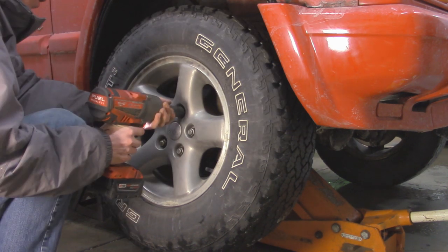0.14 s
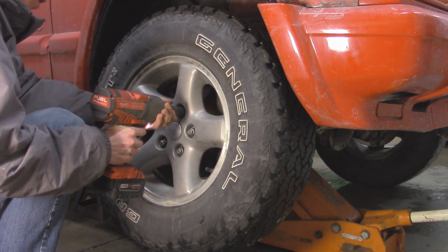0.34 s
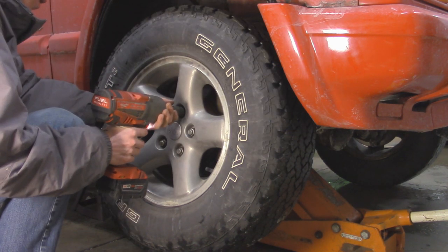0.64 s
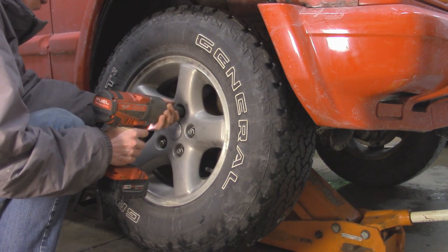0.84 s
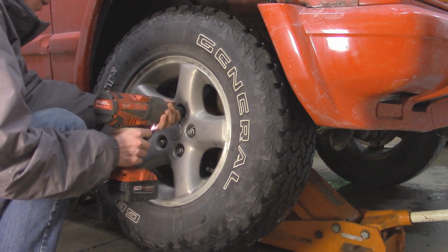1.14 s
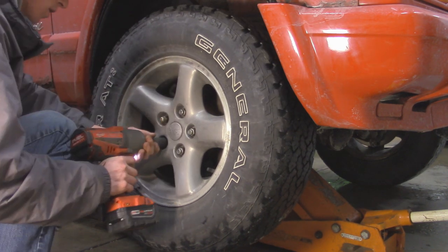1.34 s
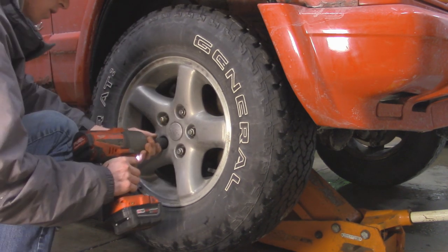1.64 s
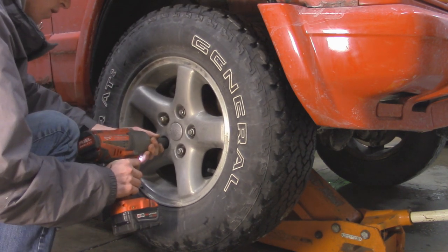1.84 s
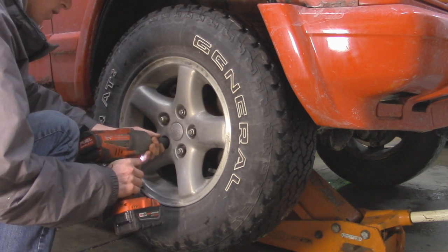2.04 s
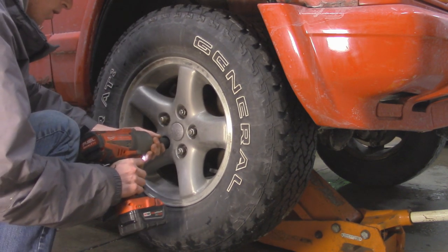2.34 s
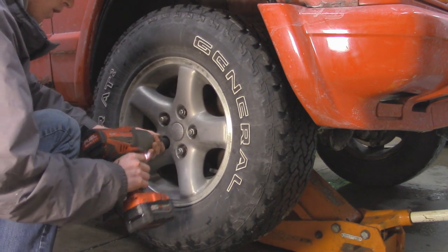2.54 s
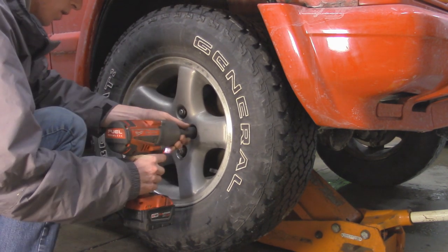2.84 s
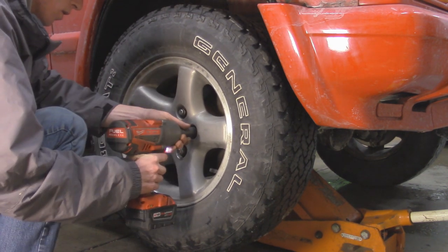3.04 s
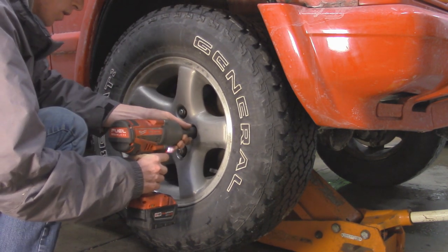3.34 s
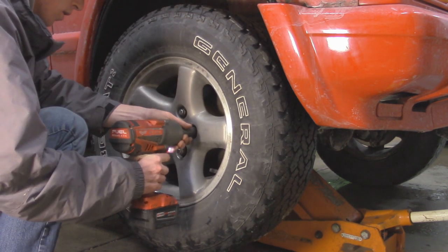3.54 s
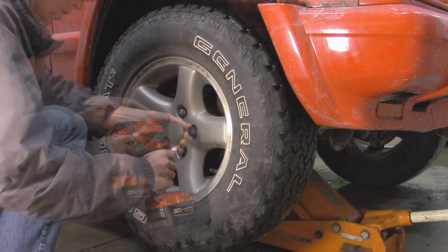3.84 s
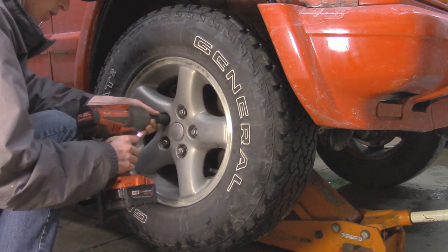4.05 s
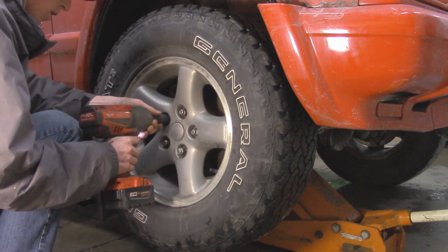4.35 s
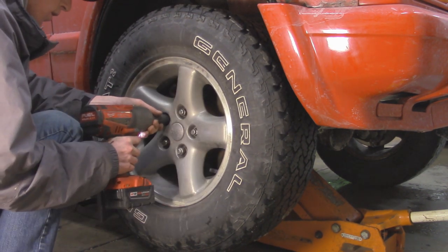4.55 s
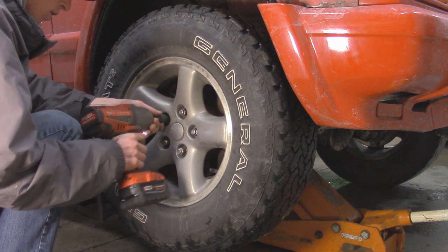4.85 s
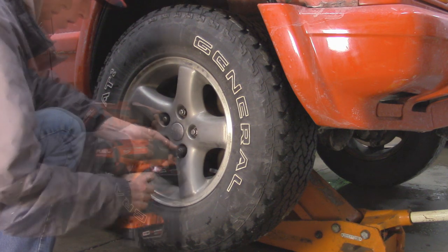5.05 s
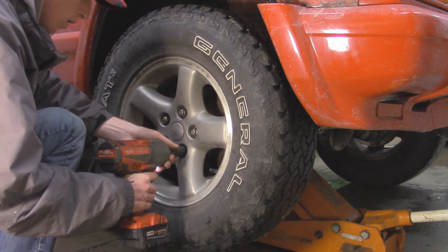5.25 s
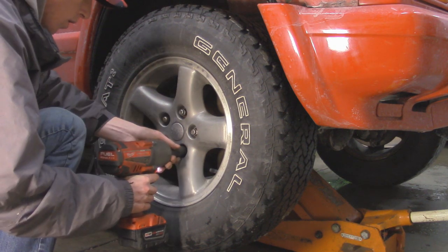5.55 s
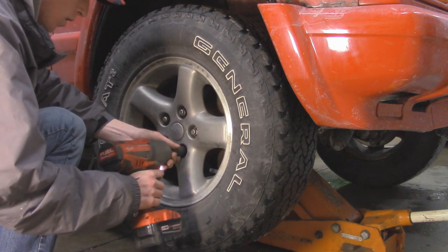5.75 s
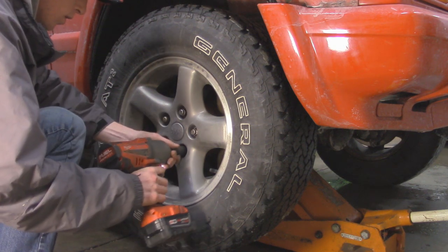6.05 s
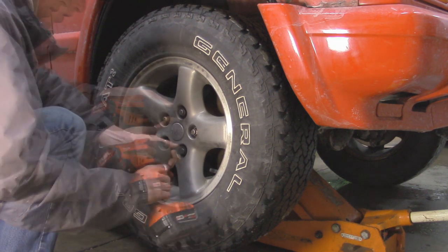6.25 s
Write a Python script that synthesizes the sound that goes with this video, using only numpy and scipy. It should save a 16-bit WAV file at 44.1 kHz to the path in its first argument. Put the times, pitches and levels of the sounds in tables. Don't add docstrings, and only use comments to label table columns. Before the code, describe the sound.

A cordless impact wrench works very close to the microphone in a garage. A high electric whistle and gear whine climb and hold, then break into hard steel clacks and a loose socket rattle. More bursts follow, some labouring, later ones faster and louder, with low thuds from the wheel and two hollow knocks midway. Faint room echo; it ends on a brief nudge.

```python
import sys
import numpy as np
from scipy import signal
from scipy.fft import rfft, irfft, next_fast_len
from scipy.io import wavfile
from scipy.ndimage import uniform_filter1d

SR = 44100
rng = np.random.default_rng(int(sys.argv[2]) if len(sys.argv) > 2 else 0)


def ratio(d):
    e = np.asarray(d, float) / 20
    return 10 ** e


def generate_wav(signal):
    frames = np.transpose(np.atleast_2d(signal))
    scaled = np.clip(frames, -1, 1) * 32767
    pcm = np.round(scaled).astype(np.int16)
    wavfile.write(sys.argv[1], SR, pcm)


N = 282227


def rms_one(x):
    return x / np.sqrt(np.mean(x ** 2) + 1e-20)


def in_time(rows):
    s, *columns = np.transpose(rows)
    return [np.interp(np.arange(N) / SR, s, c) for c in columns]


def bursts(tables, fade_s=0.0044):
    edges = []
    for table in tables:
        first, last = table[0][0], table[-1][0]
        edges += [(first - fade_s, 0), (first, 1), (last, 1), (last + fade_s, 0)]
    return in_time(edges) + in_time([row for table in tables for row in table])


def by_speed(law, hz):
    speeds, *columns = np.transpose(law)
    return [np.interp(np.log(np.maximum(hz, 1)), np.log(speeds), c) for c in columns]


def drift(rate):
    r = np.exp(-16 * np.pi * rate / SR)
    slow = signal.lfilter([1], [1, -2 * r, r * r], rng.standard_normal(N // 8 + 8002))[8000:]
    return np.interp(np.arange(N) / 8, np.arange(len(slow)), rms_one(slow))


def colour(x, spectrum, peaks=()):
    size = next_fast_len(N + 4096) * 2
    hz = np.maximum(np.arange(size // 2 + 1) * SR / size, 10)
    corner_hz, corner_db = np.transpose(spectrum)
    shape_db = np.interp(np.log(hz), np.log(corner_hz), corner_db)
    for peak_hz, width_hz, peak_db in peaks:
        shape_db = shape_db + peak_db / (1 + (2 * (hz - peak_hz) / width_hz) ** 2)
    cepstrum = irfft(np.log(ratio(shape_db)), size)
    cepstrum[1:size // 2] *= 2
    cepstrum[size // 2 + 1:] = 0
    return rms_one(irfft(rfft(x, size) * np.exp(rfft(cepstrum)), size)[:N])


def band(x, low_hz, high_hz):
    return signal.sosfilt(signal.butter(2, [low_hz, high_hz], "band", fs=SR, output="sos"), x)


def resonate(x, hz, width_hz):
    r = np.exp(-np.pi * width_hz / SR)
    poles = [1, -2 * r * np.cos(2 * np.pi * hz / SR), r * r]
    return signal.lfilter([(1 - r * r) / 2, 0, (r * r - 1) / 2], poles, x)


def lifted(x, peaks):
    return x + sum((ratio(peak_db) - 1) * resonate(x, hz, width_hz) for hz, width_hz, peak_db in peaks)


def grains(per_s, spread_db):
    sizes = ratio(spread_db * np.minimum(rng.exponential(1, N), 4)) * rng.choice([-1, 1], N)
    return rms_one(sizes * (rng.random(N) < per_s / SR))


def lines(orders, turns, base_hz=0, wobble_db=1.5, blur=.2):
    base = base_hz * np.arange(N) / SR
    total = 0
    for order, level_db in orders:
        level = np.sqrt(2) * ratio(level_db + wobble_db * drift(18.0))
        total = total + level * np.sin(2 * np.pi * (base + order * turns) + blur * drift(34.4))
    return total


def quiet_air():
    # (frequency [Hz], density [dB per Hz])
    air_colour = [(180, -50), (300, 7.5), (1940, 5.5), (2040, -23), (3670, -45), (4120, -20), (15000, -60)]
    return ratio(-44.5) * colour(rng.standard_normal(N), air_colour)


def garage(x):
    size = next_fast_len(N + SR)
    hz = np.arange(size // 2 + 1) * SR / size
    t60_s = .55 / (1 + hz / 14000)
    echo = 0
    for k, lag_s in enumerate(rng.uniform(.017, .047, 10)):
        loop = ratio(-60 * lag_s / t60_s) * np.exp(-2j * np.pi * hz * lag_s)
        echo = echo + (-1) ** k * loop / (1 - loop)
    return irfft(rfft(x, size) * echo, size)[:N] / np.sqrt(10)


def wheel():
    # (time [s], level [dB])
    rumble = [(0.0, -46.5), (1.84, -28.5), (2.17, -29.5), (3.12, -52.5), (3.6, -34), (3.74, -32.5),
              (6.02, -37), (6.4, -49)]
    # (frequency [Hz], density [dB per Hz])
    lows = [(12, -34), (20, -1), (65, 2), (141, -2), (195, 2), (273, -10), (500, -5.5), (650, -48),
            (1100, -120)]
    # (time [s], peak [dB], pitch [Hz])
    thuds = [(0.257, -26, 214), (1.073, -15.5, 207), (1.201, -36, 355), (1.658, -18, 153),
             (1.739, -12, 260), (1.801, -14.5, 132), (1.991, -25, 240), (2.161, -23.5, 168),
             (2.28, -21, 339), (3.633, -15.5, 199), (3.961, -17, 198), (4.726, -28, 303), (5.08, -20, 208),
             (5.598, -44, 239), (5.92, -22, 212)]
    level_db = in_time(rumble)[0] - 3.0 + 1.6 * drift(6.0)
    out = ratio(level_db) * colour(rng.standard_normal(N), lows)
    t = np.arange(round(.15 * SR)) / SR
    swell_and_die = (1 - np.exp(-t / 0.0019)) * np.exp(-t / 0.016)
    for s, peak_db, hz in thuds:
        at = round(s * SR)
        out[at:at + len(t)] += ratio(peak_db + 2) * swell_and_die * np.sin(2 * np.pi * hz * t)
    return out


def seating():
    # (time [s], pitch [Hz], peak [dB])
    knocks = [
        (3.585, 617, -11),
        (3.63, 683, -7),
    ]
    out, t = np.zeros(N), np.arange(round(.08 * SR)) / SR
    envelope = np.minimum(t / 0.004, 1) * np.exp(-t / 0.015)
    for s, hz, peak_db in knocks:
        at = round(s * SR)
        out[at:at + len(t)] += ratio(peak_db) * envelope * np.sin(2 * np.pi * hz * t)
    return out


def coasting():
    # (start [s], end of hold [s], level [dB], swell [dB], brightness [dB])
    coasts = [(-.3, -0.018, -33.5, 4.7, 1.5), (1.078, 1.36, -9.5, -5.5, 2), (2.307, 2.591, -14.5, 3, 1.3),
              (3.645, 3.9, -12, 0.5, 1.64), (4.731, 5.05, -15.5, 4, 2.5), (5.617, 5.776, -16.5, 4.5, 1.1),
              (5.936, 6.099, -14, 2.5, 2)]
    jolt_db, jolt_s, fade_db_per_s, dull_db_per_s = 5, 0.08, 99, 13
    t, stops = np.arange(N) / SR, np.array(coasts)
    latest = np.searchsorted(stops[:, 0] - .009, t) - 1
    start, end, level_db, swell_db, bright_db = stops[latest].T
    late_s = np.maximum(t - end, 0)
    level_db = level_db + jolt_db * np.exp(-np.maximum(t - start, 0) / jolt_s)
    level_db = level_db + swell_db * np.clip((t - start) / (end - start), 0, 1) - fade_db_per_s * late_s
    gate = np.clip((t - start) / 0.003 + 1, 0, 1)
    return gate, level_db, np.maximum(bright_db - dull_db_per_s * late_s, -4)


def socket():
    # (frequency [Hz], density [dB per Hz])
    socket_colour = [(120, -41), (200, -10.5), (379, -13.5), (599, -1.5), (946, -1.5), (1700, -0.5),
                     (2590, 4), (3280, 1.5), (4480, 1), (7890, -8), (12000, -25.5), (15800, -37)]
    # (frequency [Hz], width [Hz], height [dB])
    socket_peaks = [(2310, 3100, 5), (4820, 1900, 5), (7310, 1200, 6.5)]
    gate, level_db, bright_db = coasting()
    contacts = 0.38 * grains(6000, spread_db=-2.5) + 0.84 * rng.standard_normal(N)
    chatter = colour(contacts, socket_colour, socket_peaks)
    sizzle_db = 2 + 1.2 * bright_db
    chatter += (ratio(sizzle_db) - 1) * band(chatter, 8900, 14500)
    high = band(chatter, 3740, 9900)
    tipped = ratio(bright_db) * high + ratio(-bright_db) * (chatter - high)
    return gate * ratio(level_db + 0.86 * drift(57)) * tipped


def struck(times, gains, decay_s, contact_s=0.0028):
    clicks = np.zeros(N)
    clicks[np.round(np.array(times) * SR).astype(int)] = gains
    delay = round(contact_s * SR)
    plateau = signal.lfilter(np.ones(delay), [1], clicks)
    fall = signal.lfilter([1], [1, -np.exp(-1 / (decay_s * SR))], np.roll(clicks, delay) + 1e-18)
    return plateau + fall


def hammer():
    # (time [s], peak [dB], treble share [dB])
    clacks = [(0.2596, 0, -39), (1.0782, 3.5, -30), (1.091, 4, -26), (1.115, 3, -3.5), (1.166, -1.5, -15),
              (1.22, 5, -10), (1.2369, 1.5, -8), (2.33, -4, -28), (2.3463, 4, -15), (2.3682, -1, -19),
              (2.3894, -10, -19), (2.3993, -6, -8), (2.4319, 6.5, -17), (2.4588, 1, -20), (3.6496, -8, -36),
              (3.6608, 2, -27), (3.71, 1, -31), (4.1965, 8, -11.5), (4.218, 8, -9), (4.238, 9.5, -7.5),
              (4.754, -1, -5.5), (4.81, 5, -46), (4.8685, 2, -17), (5.2017, 0.5, -35), (5.957, 6, -10.5)]
    # (time [s], peak [dB], treble share [dB], first lug ahead [ms])
    doubles = [(1.108, 11, -12, 6), (1.2016, 5, -24, 4.4), (2.3108, 1.5, -28, 9.7), (3.679, 6.5, -11, 6.7),
               (3.7383, 3.5, -11.5, 7.3), (4.7422, 4, -16, 14), (4.797, -2, -25, 14), (5.6169, 2, -1, 10.6),
               (5.931, 0, -27, 8.4)]
    blows = list(clacks)
    for s, db, share_db, ahead_ms in doubles:
        blows.append((s, db, share_db))
        blows.append((s - ahead_ms / 1000, db - 7, share_db - 8))
    s, peak_db, treble_db = np.transpose(blows)
    crack = rng.standard_normal((3, N))
    middle = struck(s, ratio(peak_db - 6.0), 0.0033) * rms_one(band(crack[0], 1170, 6020))
    treble = struck(s, ratio(peak_db + treble_db - 2), 0.0037) * rms_one(band(crack[1], 5800, 10560))
    bass = struck(s, ratio(peak_db - 24), 0.012) * rms_one(band(crack[2], 215, 1180))
    return band(middle, 340, 8900) + treble + bass


def drive(speed_hz):
    # (field speed [Hz], upper whistle [dB], lower whistle [dB], pinion [dB], planet gears [dB])
    tone_law = [(12, -61, -37, -56, -52), (105, -53.5, -36, -63, -62), (277, -25.5, -38, -41.5, -40.5),
                (354, -26.5, -37.5, -32, -33), (572, -23, -43, -25, -31), (725, -22, -38, -15, -20.5),
                (930, -48, -47, -17, -28.5), (1100, -58, -55, -7.5, -15)]
    # (field speed [Hz], housing [dB], stator [dB])
    whirr_law = [(12, -73, -57), (105, -35, -22), (250, -28.5, -27), (324, -26, -22.5), (560, -18.5, -18.5),
                 (740, -16, -13), (950, -8.5, -21), (1165, 1.5, -16)]
    # (start [s], current cut [s], whistle [dB], gears [dB], whirr [dB])
    trigger_pulls = [(0.098, 1.09, -3, -1, 0.26), (1.315, 1.424, -11, 1.5, 1), (1.55, 2.35, -5, -0.8, 2.1),
                     (2.714, 3.6, 0.5, .3, 0.7), (3.945, 4.74, -2.4, -0.1, 1), (5.1, 5.1, -6, -1, -7.2),
                     (5.862, 5.917, -4.5, 8.5, 8), (6.371, 6.4, -1, 8, 1.5)]
    t, pulls = np.arange(N) / SR, np.array(trigger_pulls)
    latest = np.maximum(np.searchsorted(pulls[:, 0] - .012, t) - 1, 0)
    start, cut, whistle_db, gears_db, whirr_db = pulls[latest].T
    climb = np.maximum(uniform_filter1d(np.gradient(speed_hz) * SR, size=1200), 0)
    strain = np.tanh(climb / 3400)
    wake_db = -4.5 * np.exp(-np.maximum(t - start, 0) / 0.086)
    lead_s = 0.027
    upper_db, lower_db, _, _ = by_speed(tone_law, speed_hz + lead_s * climb)
    _, _, pinion_db, planet_db = by_speed(tone_law, speed_hz)
    housing_db, stator_db = by_speed(whirr_law, speed_hz)
    whistle_db = whistle_db + 1.9 * wake_db - 120 * np.maximum(t - cut, 0)
    gears_db = gears_db + 5 * np.tanh(climb / 1100)
    whirr_db = whirr_db + wake_db + 3.5 * strain
    planet_db = planet_db + gears_db - 6.5 * strain
    return (upper_db + whistle_db, lower_db + whistle_db, pinion_db + gears_db, planet_db,
            housing_db + whirr_db, stator_db + whirr_db)


def stator_kicks(speed_hz, turns):
    uneven = ratio(1.5 * rng.standard_normal(N))
    return np.diff(np.floor(turns), prepend=0) * uneven * np.sqrt(SR / (speed_hz + 30))


def housing_whirr(kicks, speed_hz, throb, level_db):
    # (frequency [Hz], density [dB per Hz])
    housing_colour = [(88, -55), (150, -31), (937, -9.5), (1210, -9.5), (1470, -7), (2630, -5.5),
                      (2840, -3.5), (10700, -18), (14300, -40), (15800, -65)]
    # (frequency [Hz], width [Hz], height [dB])
    housing_peaks = [(1215, 170, 6), (3660, 220, 2), (5100, 500, 2)]
    chatter = 0.25 * kicks + 0.48 * grains(6000, spread_db=1.0) + 0.73 * rng.standard_normal(N)
    whirr = ratio(1.5 * throb + .9 * drift(30)) * colour(chatter, housing_colour, housing_peaks)
    dull_db = -3.5 * np.log2(speed_hz / 500)
    whirr += (ratio(dull_db) - 1) * band(whirr, 7500, 12600)
    return ratio(level_db) * whirr


def stator(kicks, speed_hz, turns, level_db):
    # (multiple of field speed, level [dB])
    overtones = [(4.0, -3), (5.0, -7), (7.0, -2), (10.0, -3)]
    stator_hz = 2850
    sung = ratio(level_db) * lines(overtones, turns, wobble_db=6.5, blur=0.99)
    sung = resonate(resonate(sung, stator_hz, 420), stator_hz, 900)
    torque = np.clip(uniform_filter1d(np.gradient(speed_hz) * SR, size=800) / 2800, 0, 1)
    push = (.2 + .4 * torque) * kicks + .5 * rng.standard_normal(N)
    rung = rms_one(resonate(resonate(push, stator_hz, 260), stator_hz, 540))
    return ratio(-2.5) * sung + ratio(level_db - 7.0) * rung


def gears(speed_hz, turns, throb, pinion_db, planet_db):
    # (multiple of field speed, level [dB])
    pinion_orders = [(3.25, 0), (6.5, -13)]
    # (multiple of field speed, level [dB])
    planet_orders = [(1.03, -13), (1.135, -3), (2.27, -4), (4.55, -8), (5.4, -10), (6.8, -8)]
    # (multiple of field speed, level [dB])
    ring_orders = [(7.95, -10), (10.2, -12), (12.5, -15)]
    # (frequency [Hz], width [Hz], height [dB])
    gear_peaks = [(1215, 170, 9), (2450, 200, 6), (3660, 200, 13)]
    pinion = ratio(pinion_db + 1.2 * throb) * lines(pinion_orders, turns, wobble_db=2.2, blur=.4)
    cogging_db = pinion_db - 5 - np.maximum(speed_hz - 560, 0) / 20
    cogging = ratio(cogging_db) * lines([(3.0, 0)], turns, wobble_db=2.5, blur=.6)
    planet_blur = 1.2 * np.maximum(speed_hz / 550, 1) ** 2
    planets = lines(planet_orders, turns, wobble_db=4.0, blur=planet_blur)
    planets = ratio(planet_db + 4.0 * throb) * planets
    ring_db = planet_db + 4.0 * throb - np.abs(speed_hz - 545) / 9
    ring = ratio(ring_db) * lines(ring_orders, turns, wobble_db=7.5, blur=0.92)
    return pinion + cogging + ring + lifted(band(planets, 460, 2800), gear_peaks)


def whistle(turns, upper_db, lower_db):
    # (multiple of field speed, level [dB])
    upper_bands = [(2, -41), (3, -50), (4, -50), (5, -45)]
    # (multiple of field speed, level [dB])
    lower_bands = [(0, -25), (-1, 7), (-2, -74), (-3, -40), (-4, -56)]
    # (frequency [Hz], width [Hz], height [dB])
    vent_peaks = [(10900, 300, 18), (11400, 250, 22), (12010, 150, 22)]
    switching_hz = 9869
    upper = lines([(1, 0)], turns, switching_hz, wobble_db=1.74, blur=0.047)
    upper += lifted(lines(upper_bands, turns, switching_hz, wobble_db=2.0, blur=.3), vent_peaks)
    upper += ratio(-17.5) * rms_one(band(rng.standard_normal(N), 10900, 12300))
    lower = lines(lower_bands, turns, switching_hz, wobble_db=1.0, blur=.15)
    return ratio(upper_db) * upper + ratio(lower_db) * lower


def motor():
    # (time [s], field speed [Hz])
    speed_curves = [
        [(0.125, 9), (0.205, 105), (0.274, 265), (0.34, 296), (0.56, 298), (0.634, 469), (0.68, 504),
         (0.783, 517), (1.088, 504)],
        [(1.312, 429), (1.352, 637), (1.397, 697), (1.45, 545), (1.527, 321), (1.566, 200)],
        [(1.591, 15), (1.69, 655), (1.756, 793), (1.793, 787), (1.911, 445), (1.956, 357), (2.07, 321),
         (2.24, 349), (2.35, 330)],
        [(2.684, 269), (2.734, 313), (2.8, 390), (2.883, 409), (2.998, 513), (3.098, 541), (3.582, 538),
         (3.622, 433), (3.737, 410)],
        [(3.931, 253), (4.075, 265), (4.13, 820), (4.176, 997), (4.225, 1061), (4.285, 985), (4.44, 710),
         (4.57, 570), (4.739, 505)],
        [(5.083, 293), (5.118, 413), (5.15, 780), (5.21, 1040), (5.283, 1125), (5.44, 1156), (5.505, 1090),
         (5.567, 929), (5.612, 721)],
        [(5.862, 17), (5.882, 65), (5.927, 269)],
        [(6.371, 13), (6.39, 37)],
    ]
    gate, speed_hz = bursts(speed_curves)
    upper_db, lower_db, pinion_db, planet_db, housing_db, stator_db = drive(speed_hz)
    turns = np.cumsum(speed_hz) / SR
    anvil = 2 * np.pi * turns / 46
    throb = np.cos(anvil + 1.74) + 0.43 * np.cos(2 * anvil + 0.41)
    kicks = stator_kicks(speed_hz, turns)
    whirr = housing_whirr(kicks, speed_hz, throb, housing_db) + stator(kicks, speed_hz, turns, stator_db)
    whine = gears(speed_hz, turns, throb, pinion_db, planet_db)
    return gate * (whirr + whine + whistle(turns, upper_db, lower_db))


def scene():
    tool = motor() + socket() + hammer() + seating()
    return (tool + ratio(-10) * garage(tool) + wheel() + quiet_air())[None]


def low_pass(x):
    return signal.sosfilt(signal.butter(12, 16240, fs=SR, output="sos"), x)


def record(dry):
    knee_db, recovery_db_per_s, attack_s = -1.5, 320, 0.0032
    over_db = 1.06 * np.maximum(20 * np.log10(np.abs(dry) + 1e-9) - knee_db, 0)
    ramp_db = recovery_db_per_s * np.arange(N) / SR
    held_db = np.maximum(np.maximum.accumulate(over_db + ramp_db, axis=1) - ramp_db, 0)
    r = np.exp(-1 / (attack_s * SR))
    ducked = dry * ratio(-signal.lfilter([1 - r], [1, -r], held_db))
    return low_pass(np.clip(ducked, -.97, .97))


dry = scene()
out = record(dry)
generate_wav(out)
```